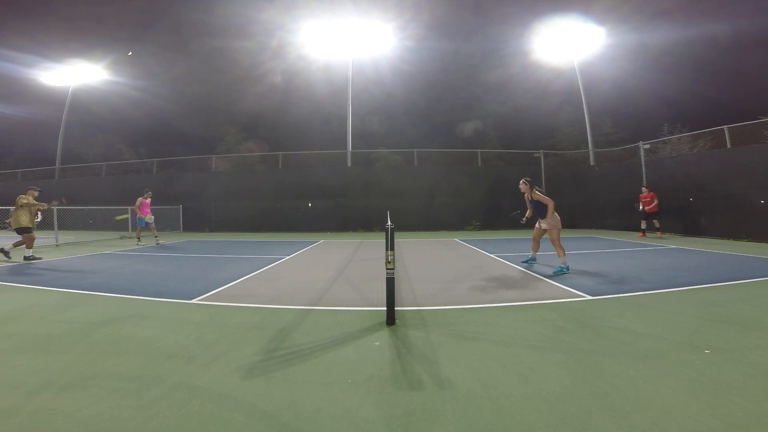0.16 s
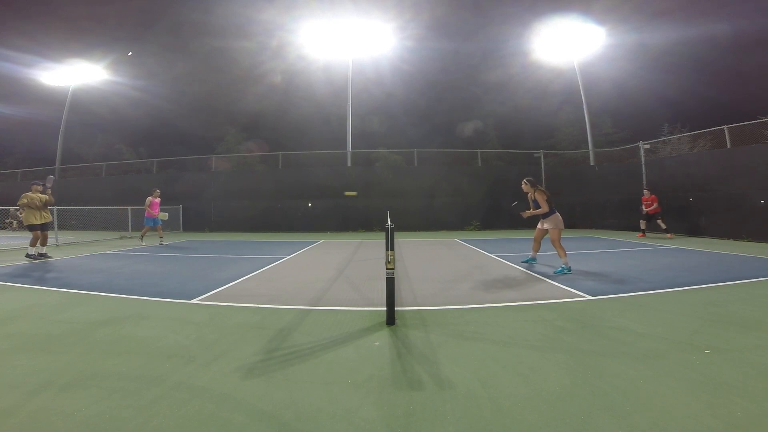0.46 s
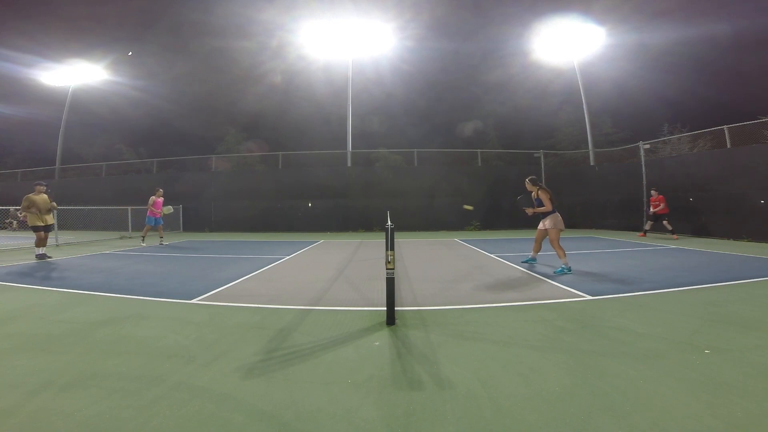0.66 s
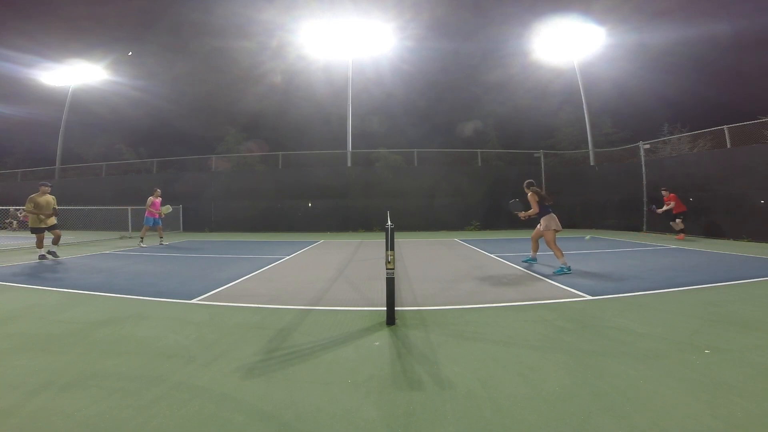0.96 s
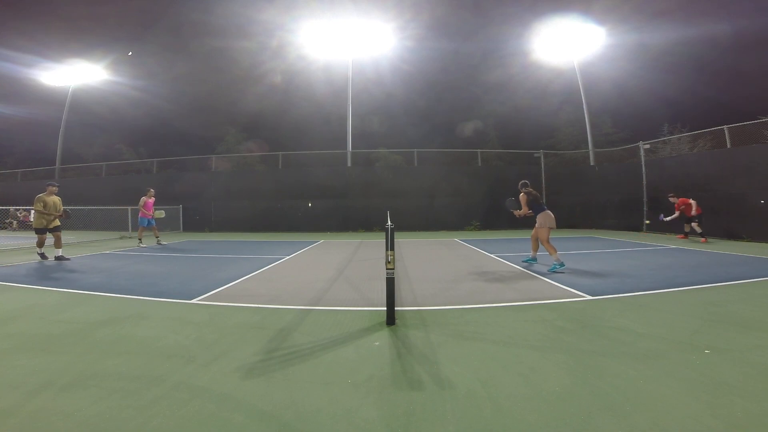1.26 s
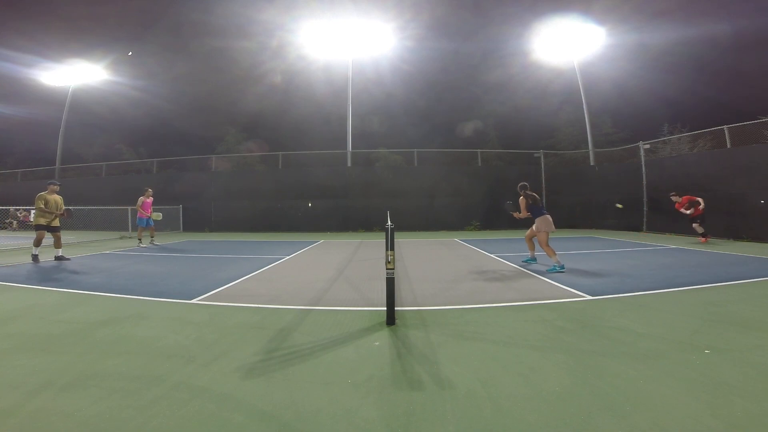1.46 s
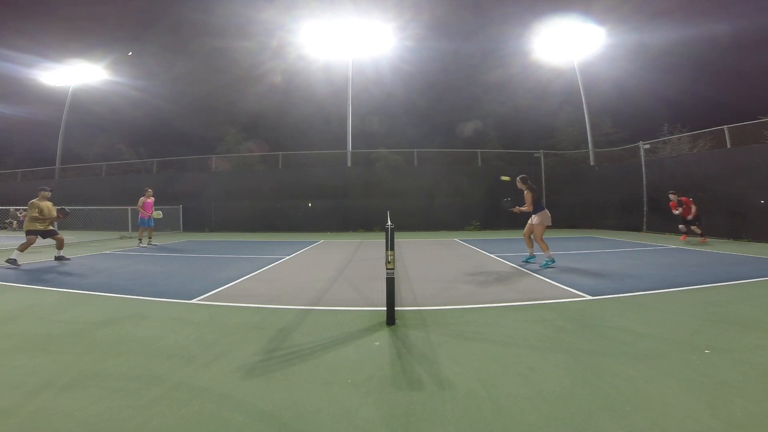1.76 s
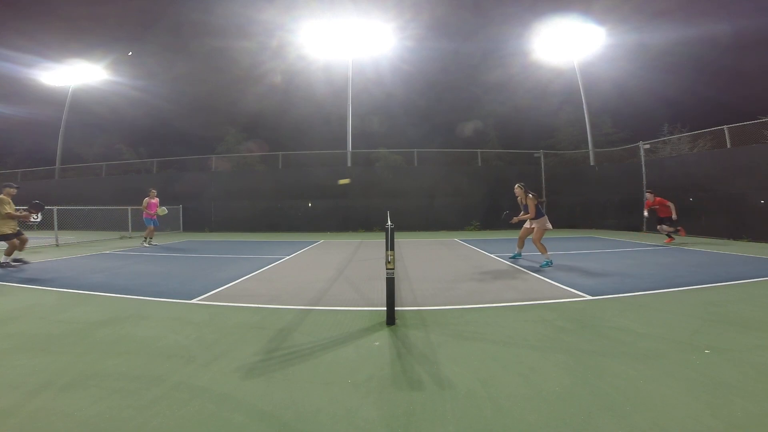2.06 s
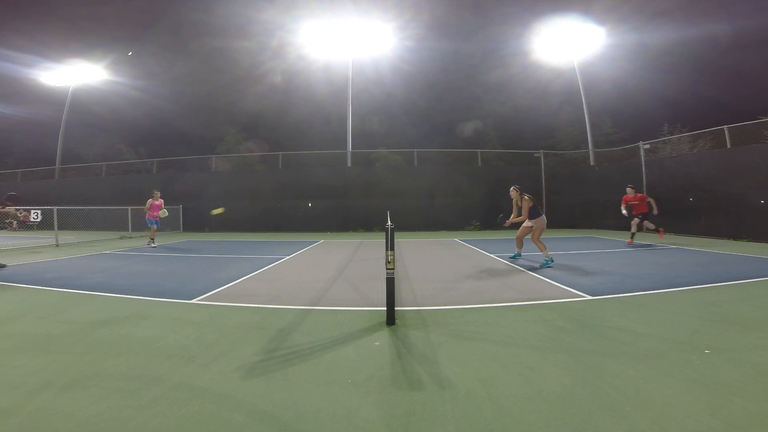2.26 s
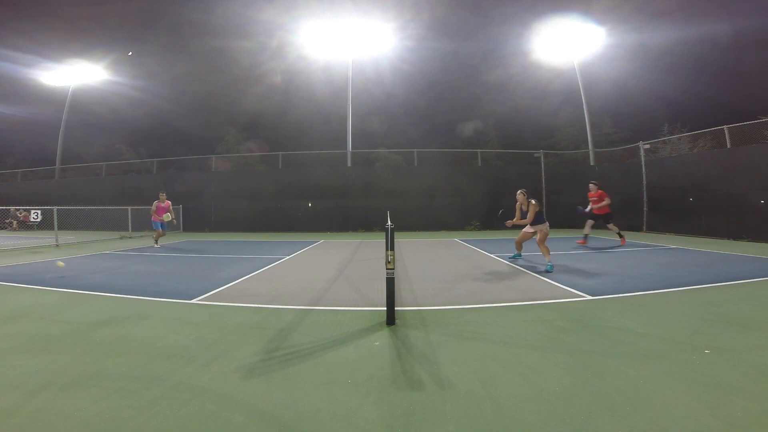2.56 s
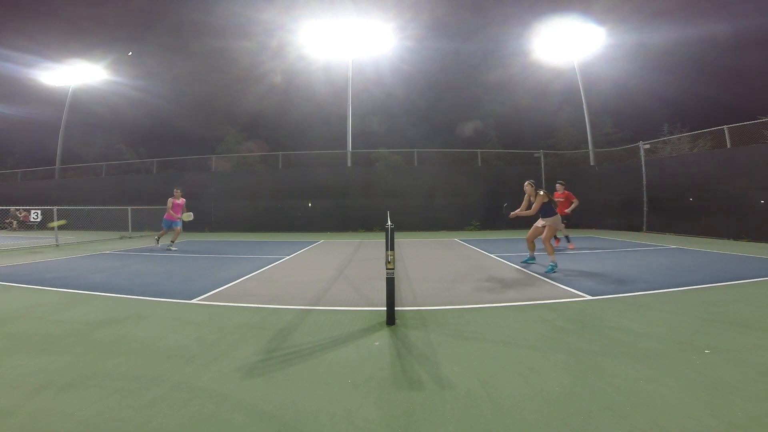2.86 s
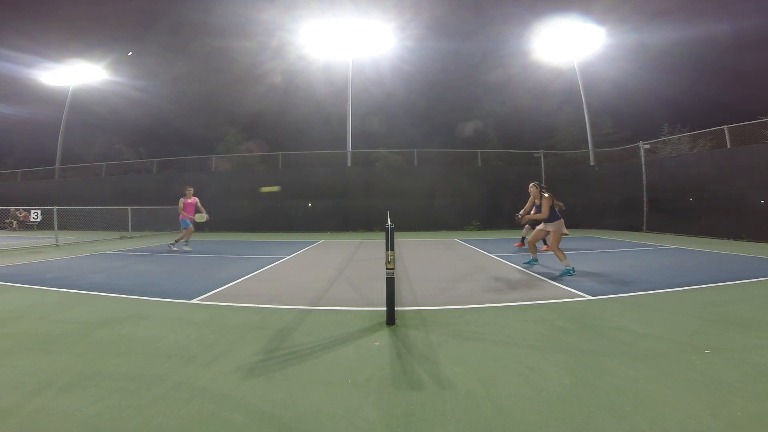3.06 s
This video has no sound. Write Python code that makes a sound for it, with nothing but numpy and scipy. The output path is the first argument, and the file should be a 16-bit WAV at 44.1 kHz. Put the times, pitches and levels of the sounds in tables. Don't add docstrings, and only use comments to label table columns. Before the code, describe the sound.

A pickleball rally outdoors: a bounce and paddle hit at the start, a return midway, and a hard drive near the end, with fence echoes, footsteps and squeaks over low engine hum, heard by a courtside microphone.

```python
import sys
import numpy as np
from scipy import signal
from scipy.io import wavfile
from scipy.ndimage import uniform_filter1d

SR = 44100
rng = np.random.default_rng(int(sys.argv[2]) if len(sys.argv) > 2 else 0)


def boost(x):
    u = np.asarray(x, float) / 20
    return 10 ** u


def log_audio(samples):
    frames = np.atleast_2d(samples).T
    limited = np.clip(frames, -1, 1)
    pcm = np.round(limited * 32767).astype(np.int16)
    wavfile.write(sys.argv[1], SR, pcm)


N = 141120


def band(x, hz, width):
    widest = 0.47 * SR / hz
    b, a = signal.iirpeak(min(hz, 0.4 * SR), 1 / min(width, widest), fs=SR)
    return signal.lfilter(b, a, x)


def dull(x, hz):
    return signal.lfilter(*signal.butter(2, min(hz, 0.45 * SR), fs=SR), x)


def thin(x, hz):
    return signal.lfilter(*signal.butter(2, hz, "high", fs=SR), x)


def unit(x):
    return x / np.sqrt(np.mean(x ** 2))


def add(out, start_s, x):
    i = int(start_s * SR)
    out[i:i + len(x)] += x[:len(out) - i]


def fade(t, t60_s):
    return np.exp(-np.log(1000) * t / t60_s)


def walk(rate_hz):
    hold = int(SR / rate_hz)
    steps = np.repeat(rng.standard_normal(N // hold + 1), hold)
    return 1.71 * uniform_filter1d(uniform_filter1d(steps, hold), hold)[:N]


# pitch_hz, level_db (per Hz)
TOWN_COLOUR = [(25, -1), (70, -2), (170, -2), (450, -18), (1200, -18.5), (3000, -32), (7000, -44.5),
               (15000, -54.5)]


def town():
    out, swell = 0, walk(1.0)
    colour_hz, colour_db = np.array(TOWN_COLOUR).T
    for hz in 28 * 2 ** np.arange(0, 9.2, 0.5):
        level_db = np.interp(np.log(hz), np.log(colour_hz), colour_db) + 10 * np.log10(hz)
        level_db = level_db + 2.57 * swell + 1.04 * walk(7.87)
        noise = band(band(rng.standard_normal(N), hz, 0.45), hz, 0.45)
        out = out + boost(level_db) * unit(noise)
    return boost(-42.5) * unit(out)


# time_s, firing_tone_db, exhaust_db
ENGINE_MOVES = [
    (0, -32.5, -34),
    (.7, -34, -37),
    (1.27, -38, -39.5),
    (1.4, -45, -39.5),
    (1.65, -40.5, -49),
    (1.95, -47, -47.5),
    (2.15, -37.5, -43.5),
    (2.5, -46, -44),
    (2.75, -39.5, -43.5),
    (3.2, -41, -47),
]
# multiple_of_cycle, level_db
EXHAUST_NOTE = [(5, -3), (8, 0), (9, -14.5), (11, -4.5), (12, -13.5), (13, -3), (14, -18), (17, -9.5),
                (18, -8), (19, -36), (22, -13.5), (25, -11.5)]


def engine():
    cycle_hz, sag_hz_per_s, firing_multiple = 16.45, 0.1, 8
    t = np.arange(N) / SR
    time_s, firing_db, exhaust_db = np.array(ENGINE_MOVES).T
    tone_db = np.interp(t, time_s, firing_db)
    pipe_db = np.interp(t, time_s, exhaust_db)
    near_db = exhaust_db[0] + 1.75 * (pipe_db - exhaust_db[0])
    phase = 2 * np.pi * np.cumsum(cycle_hz - sag_hz_per_s * t) / SR
    roar = band(band(rng.standard_normal(N), 225, 0.61), 273, 1.9)
    out = boost(pipe_db - 3.5) * unit(roar)
    for multiple, db in EXHAUST_NOTE:
        level_db = tone_db + 2.5 if multiple == firing_multiple else near_db + db + 2.5
        flutter_db = 1.62 * walk(22.05)
        wobble = 6.52 * rng.random() + 0.5 * walk(8.91)
        out = out + boost(level_db + flutter_db) * np.sin(multiple * phase + wobble)
    return out


# start_s, level_db, pitch_hz (centre)
GRIT_TICKS = [(.043, -50, 4000), (.15, -40, 9500), (.17, -39, 4200), (.18, -49, 11000), (.186, -48, 6000),
              (.322, -48, 9000), (.9747, -47, 4200), (1.019, -22.5, 1940), (1.041, -47, 10010),
              (1.138, -41.5, 4100), (1.139, -44, 2300), (1.162, -58, 10000), (1.812, -49, 2400),
              (1.921, -49, 6200), (1.955, -52, 7000), (2.614, -31, 9550), (2.655, -47, 5000),
              (2.82, -39, 4500)]


def grit_ticks():
    out, t = np.zeros(N), np.arange(2000) / SR
    for start_s, level_db, hz in GRIT_TICKS:
        burst = rng.standard_normal(len(t)) * fade(t, 0.022)
        add(out, start_s, boost(level_db - 2.0) * band(burst, hz, 1.86))
    return out


def court(cores, bright):
    scatter_per_s, tail_hz = 140, 1100
    t = np.arange(SR) / SR
    chance, strength = rng.random((2, len(t)))
    scatter = (chance < scatter_per_s / SR) * (strength - 0.5) * 30
    taps = scatter + 0.62 * rng.standard_normal(len(t))
    ring = band(band(taps, tail_hz, 0.29), tail_hz, 0.61)
    ring = ring + 0.52 * band(taps, 1.87 * tail_hz, 0.53)
    splash = dull(thin(rng.standard_normal(len(t)), 1700), 9000)
    splash = splash * boost(2.3 * walk(115)[:len(t)])
    out = 0
    for source, colour, t60_s, level_db in ((cores, ring, 1.1, -25), (bright, splash, 0.54, -7)):
        tail = boost(level_db) * unit(colour * fade(t, t60_s)) * np.clip(t / 0.0065, 0, 1)
        out = out + signal.fftconvolve(source, tail / np.sqrt(len(t)))[:N]
    return out


def blow(row, sign, modes, ground_ms, ground_db):
    _, thump_db, contact_ms, ring_db, crack_db = row
    t = np.arange(4000) / SR
    u = t * 1000 / contact_ms
    thump = np.sin(np.pi * u) * np.where(u < 1, 1, np.exp(-1.2 * (u - 1)))
    ring = sum(boost(db) * np.sin(2 * np.pi * hz * t) * fade(t, t60_s) for hz, db, t60_s in modes)
    ring = (1 - np.exp(-1.6 * u)) * ring / np.abs(ring).max()
    crack = band(rng.standard_normal(len(t)), 3900, 1.28)
    crack = crack * (fade(t, 0.011) + 0.056 * fade(t, 0.047))
    x = sign * (boost(thump_db) * thump + boost(ring_db) * ring) + boost(crack_db) * crack
    return x + boost(ground_db) * np.interp(t - ground_ms / 1000, t, x, left=0)


# start_s, thump_db, contact_ms, ring_db, crack_db
BALL_BLOWS = [
    (0.1307, -4.5, 0.83, -5.5, -24),
    (0.1918, -3.5, 0.45, -15.5, -6.5),
    (.193, -4.5, 0.66, -1.5, -13),
    (1.4317, -3.5, 0.67, -4.5, -12),
    (2.8985, -9, 0.51, 7.5, -6.5),
]
PUSH_SIGNS = (-1, 1, -1, 1, 1)
# pitch_hz, level_db, t60_s
BOUNCE_RING = [(385, -4.5, 0.014), (1150, -0.5, 0.019), (1670, -3, 0.006), (2140, -8, 0.017),
               (4400, -19, 0.016), (6019, -20, .007)]
SERVE_RING = [(1020, -7, 0.074), (1800, 12, 0.011), (2580, 7, 0.0099), (4220, -2, 0.0075),
              (6800, -4, 0.006)]
RETURN_RING = [(418, -0.5, 0.023), (800, -19, 0.033), (1154, 4, 0.036), (1665, 0.5, 0.017),
               (2520, -5.5, 0.025), (4010, -4.5, 0.02), (6570, -9.5, 0.018), (7840, -8, 0.014),
               (10800, -18, 0.0091)]
DRIVE_RING = [(474, 1.5, 0.0082), (1121, -1.5, 0.025), (1313, 4, 0.0094), (1630, -3, 0.014),
              (1900, -21, 0.004), (3176, -3.5, 0.012), (4520, -7, 0.0075), (5860, -12.5, 0.0098),
              (7500, -15, 0.015)]
COURT_DELAY_MS = (1.9, 2.1, 1.6, 1.8, 1.52)
COURT_BOUNCE_DB = (-29, -20, -28, -18, -13.5)


def ball():
    dry, cores, clicks = np.zeros((3, N))
    rings = (BOUNCE_RING, SERVE_RING, SERVE_RING, RETURN_RING, DRIVE_RING)
    settings = zip(BALL_BLOWS, PUSH_SIGNS, rings, COURT_DELAY_MS, COURT_BOUNCE_DB)
    hits = [thin(blow(*each), 129) for each in settings]
    for (start_s, _, _, _, crack_db), hit in zip(BALL_BLOWS, hits):
        add(dry, start_s, hit)
        add(cores, start_s, hit * fade(np.arange(len(hit)) / SR, 0.0059))
        add(clicks, start_s, boost(crack_db) * np.ones(1))
    return hits, dry, cores, clicks


# start_s, level_db, dullness_hz
FENCE_SLAPS = [(0.144, -9, 3020), (.1805, -6, 1300), (.204, -9, 4500), (.2075, -9, 1500),
               (.223, -10, 14000), (0.2564, -16, 4500), (0.303, -15, 2480), (.3285, -5.5, 1180),
               (.375, -22, 1300), (.422, -16, 1300), (.482, -20, 1200), (1.4533, -13, 13600),
               (1.4545, -14, 4000), (1.4968, -14, 4500), (1.528, -16, 5040), (1.5595, -20.5, 5500),
               (1.586, -26, 1500), (2.912, -25, 7000), (2.9156, -12, 1500), (2.9384, -16, 14000),
               (2.9504, -21.5, 2500), (2.9555, -24, 1300), (2.969, -24, 1300), (2.9867, -31, 1300),
               (3.001, -27, 1300), (3.0127, -27, 1800), (3.0212, -22, 1000), (3.0424, -17.5, 1200),
               (3.134, -30, 1100)]


def fence_slaps(hits):
    out = np.zeros(N)
    t = np.arange(len(hits[0])) / SR
    shorten = fade(t, 0.0059) ** 0.21
    mesh = rng.standard_normal(600) * fade(np.arange(600) / SR, 0.012) / 5.6
    for start_s, level_db, hz in FENCE_SLAPS:
        hit = hits[sum(row[0] < start_s for row in BALL_BLOWS) - 1]
        if hz > 8000:
            slap = thin(signal.fftconvolve(hit, mesh)[:len(t)], 5400)
        else:
            slap = band(dull(hit, hz), 700 + 0.29 * hz, 0.89)
        add(out, start_s, boost(level_db) * slap * shorten)
    return out


# start_s, thud_db, thud_hz, grit_db, grit_hz
FOOTFALLS = [(.243, -9.5, 1100, -28, 1930), (.918, -46, 800, -49, 2200), (1.049, -35.5, 700, -47, 2200),
             (1.083, -37, 700, -51, 2470), (1.4, -20.5, 630, -36.5, 2400), (1.604, -20.5, 545, -48, 1980),
             (1.806, -24.5, 710, -41, 2380), (1.832, -23.5, 546, -40.5, 2440),
             (2.151, -21.5, 564, -39, 2120), (2.18, -26.5, 600, -57, 2000), (2.366, -30, 347, -75, 1992),
             (2.391, -26, 510, -54.5, 2480), (2.615, -28, 432, -42.5, 2370), (2.665, -31, 450, -62, 2000),
             (2.7704, -38, 600, -31.5, 2880), (2.7736, -11.5, 330, -34, 1970),
             (2.7806, -22, 125, -50, 1800), (2.808, -26.5, 500, -39, 1900), (3.0412, -19, 600, -45, 2210)]


def footfalls():
    thud_turns, thud_rise = 1.59, 13
    out, t = np.zeros(N), np.arange(2000) / SR
    for start_s, thud_db, thud_hz, grit_db, grit_hz in FOOTFALLS:
        thud = -np.sin(2 * np.pi * thud_hz * t) * (1 - np.exp(-thud_rise * thud_hz * t))
        thud = thud * fade(t, 2 * thud_turns / thud_hz)
        grit = rng.standard_normal(len(t)) * fade(t, 0.026)
        grit = band(band(grit, grit_hz, 0.48), grit_hz, 1.05)
        add(out, start_s, boost(thud_db + 5.5) * thud + boost(grit_db + 17.0) * grit)
    return out


# start_s, length_s, level_db, start_hz, end_hz (centres)
SOLE_SLIDES = [(0.436, 0.008, -52, 9500, 7800), (.443, 0.012, -45, 8500, 4200),
               (0.447, 0.057, -47.5, 3260, 1900), (0.759, 0.025, -57.5, 9900, 10000),
               (.78, 0.23, -65, 9000, 4600), (0.787, 0.14, -52, 2520, 2300), (0.823, .03, -56, 2400, 2100),
               (0.962, 0.078, -54, 5700, 3300), (1.038, .02, -58, 9000, 5300),
               (1.18, 0.018, -61, 7000, 5000), (1.34, 0.083, -59.5, 3500, 3900),
               (1.599, 0.085, -60.5, 5000, 4500), (1.846, 0.02, -52, 7000, 3400),
               (1.985, 0.072, -57, 3000, 2200), (2.078, 0.015, -49.5, 4950, 2400),
               (2.095, 0.11, -50.5, 3540, 3300), (2.14, 0.044, -51.5, 4500, 3800),
               (2.411, 0.023, -60, 6000, 4500), (2.561, 0.013, -52, 9000, 9700),
               (2.742, 0.012, -42.5, 7900, 5600), (2.746, 0.16, -48.5, 6150, 4400),
               (2.889, 0.11, -46.5, 6000, 3400), (3, 0.19, -43, 4600, 3170)]


def scuffs():
    rise_s, swell_per_s, fall_s, sag_db = 0.0018, 2.85, 0.014, 3
    out, t = np.zeros(N), np.arange(12000) / SR
    for start_s, length_s, level_db, start_hz, end_hz in SOLE_SLIDES:
        noise = rng.standard_normal(len(t))
        u = np.clip(t / length_s, 0, 1)
        env = np.clip(t / (rise_s + swell_per_s * length_s ** 2), 0, 1) ** 1.25
        env = env * boost(-sag_db * u ** 2) * np.exp(-np.maximum(t - length_s, 0) / fall_s)
        centres = (start_hz, np.sqrt(start_hz * end_hz), end_hz)
        first, middle, last = (unit(band(band(noise, hz, 1), hz, 2.0)) for hz in centres)
        slide = (1 - u) ** 2 * first + 2 * u * (1 - u) * middle + u ** 2 * last
        add(out, start_s, boost(level_db) * env * slide)
    out = out * boost(walk(430) + 1.74 * walk(45.0))
    out[16:] += 0.25 * out[:-16]
    return out


# start_s, length_s, level_db, start_hz, end_hz
SOLE_SQUEAKS = [
    (2.614, 0.0083, -38.5, 2520, 2500),
    (2.883, 0.016, -42.5, 2900, 2650),
    (3.085, .014, -39, 3500, 2950),
    (3.098, 0.019, -46, 2970, 3100),
    (3.122, .012, -50, 3000, 2950),
    (3.157, 0.0085, -30.5, 2930, 2880),
    (3.17, 0.014, -52, 3020, 2900),
]
OVERTONES_DB = (-24, -26)


def squeaks():
    out = np.zeros(N)
    for start_s, length_s, level_db, start_hz, end_hz in SOLE_SQUEAKS:
        u = np.arange(int(length_s * SR)) / (length_s * SR)
        hz = end_hz + (start_hz - end_hz) * (1 - u) ** 2
        phase = 2 * np.pi * np.cumsum(hz) / SR
        tone = np.sin(phase)
        for harmonic, db in enumerate(OVERTONES_DB, 2):
            tone = tone + boost(db) * np.sin(harmonic * phase)
        add(out, start_s, boost(level_db + 4.5) * np.sin(np.pi * u) ** 0.69 * tone)
    return out


def scene():
    background = town() + engine()
    hits, blows, cores, clicks = ball()
    shoes = thin(grit_ticks() + footfalls(), 110) + scuffs() + squeaks()
    tail = court(2.14 * cores + 1.17 * shoes, clicks + 0.34 * shoes)
    return (blows + fence_slaps(hits) + shoes + tail + background)[None]


def top_cut(x):
    return signal.sosfilt(signal.butter(12, 16520, fs=SR, output="sos"), x)


def record(dry):
    ceiling, knee = 1.03, 6
    edge = signal.butter(8, 15300, fs=SR, output="sos")
    x = signal.sosfilt(edge, dull(dry, 12650)) / ceiling
    clipped = ceiling * x / (1 + np.abs(x) ** knee) ** (1 / knee)
    return top_cut(clipped)


dry = scene()
out = record(dry)
log_audio(out)
```